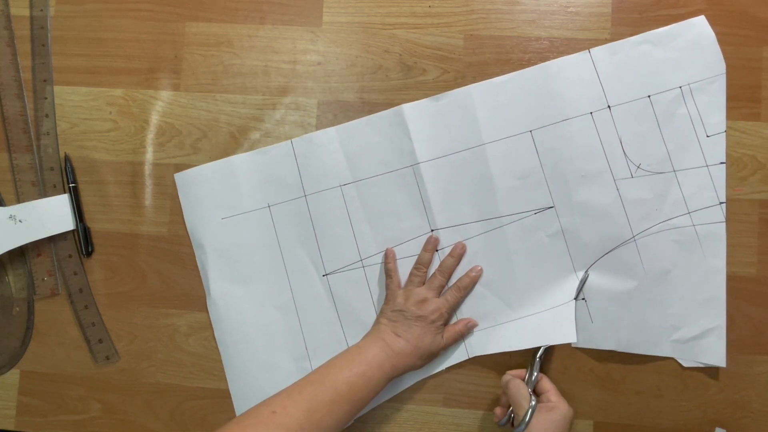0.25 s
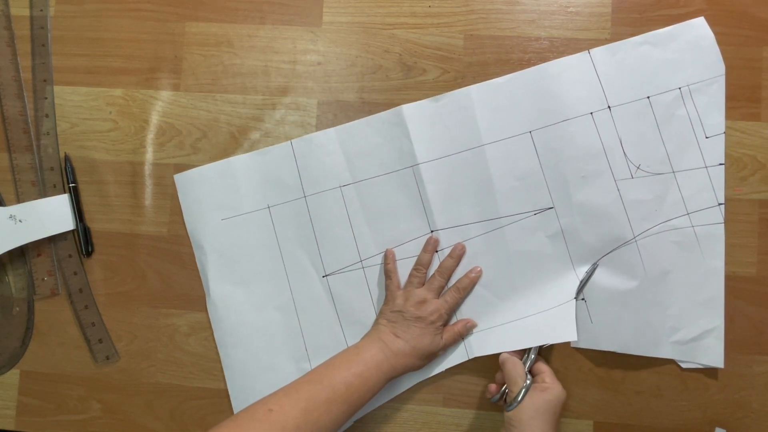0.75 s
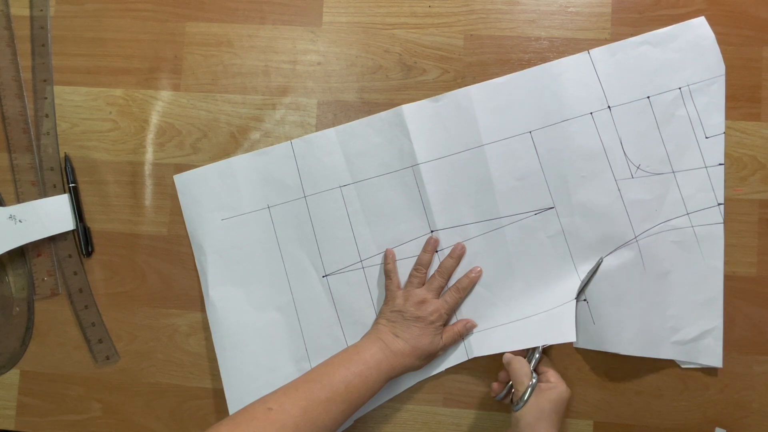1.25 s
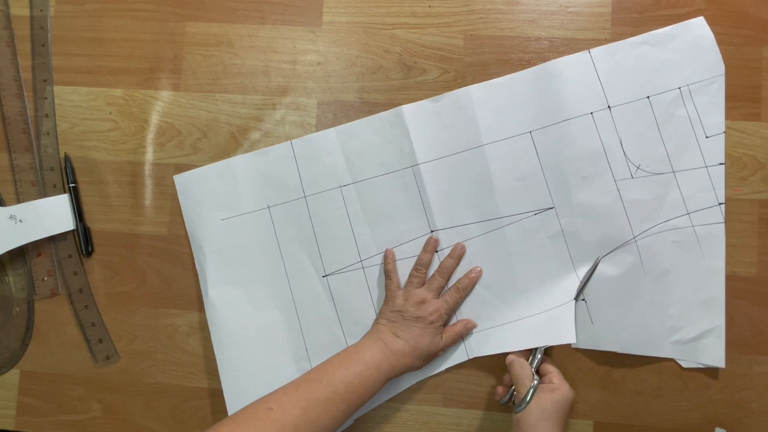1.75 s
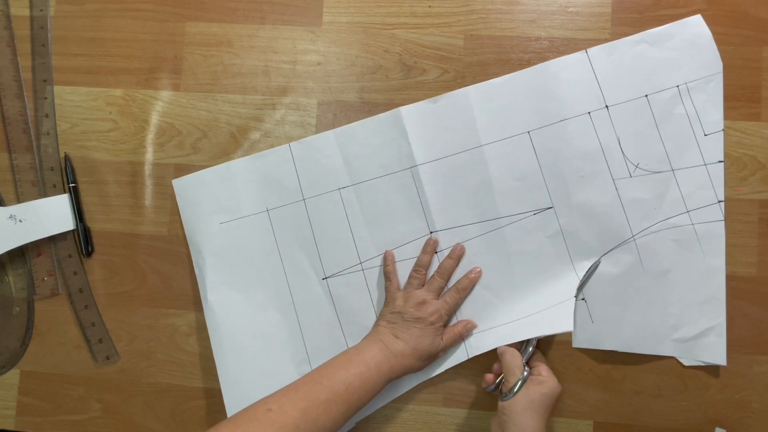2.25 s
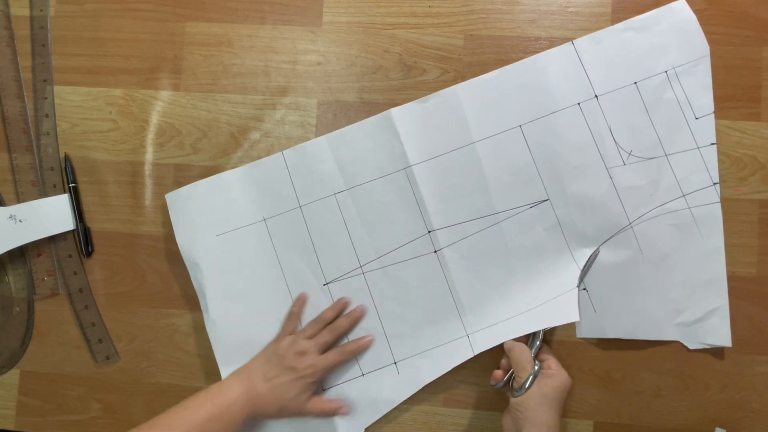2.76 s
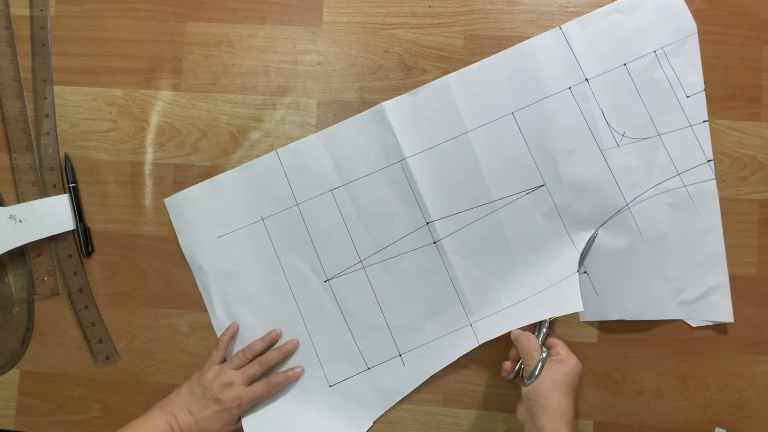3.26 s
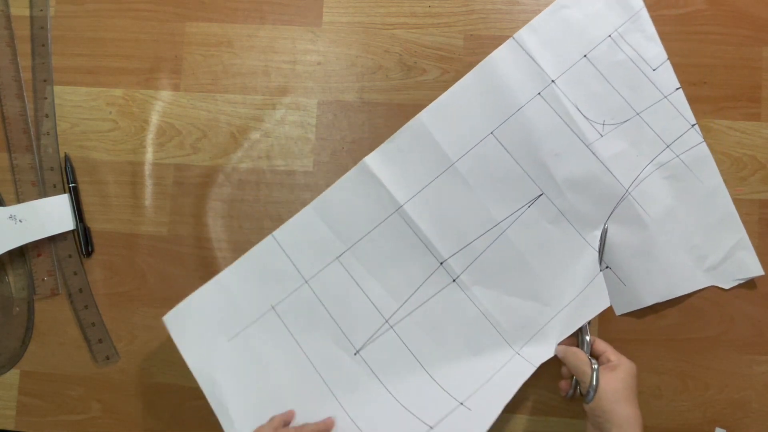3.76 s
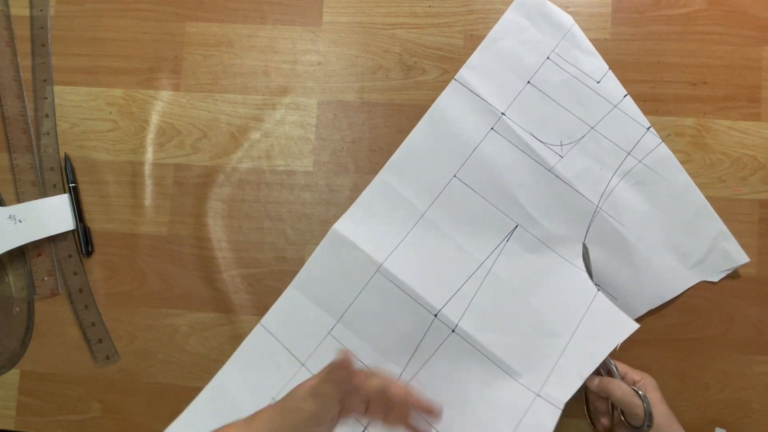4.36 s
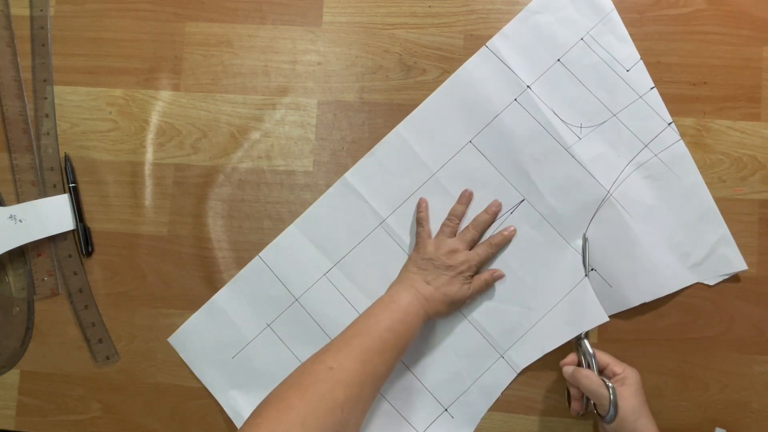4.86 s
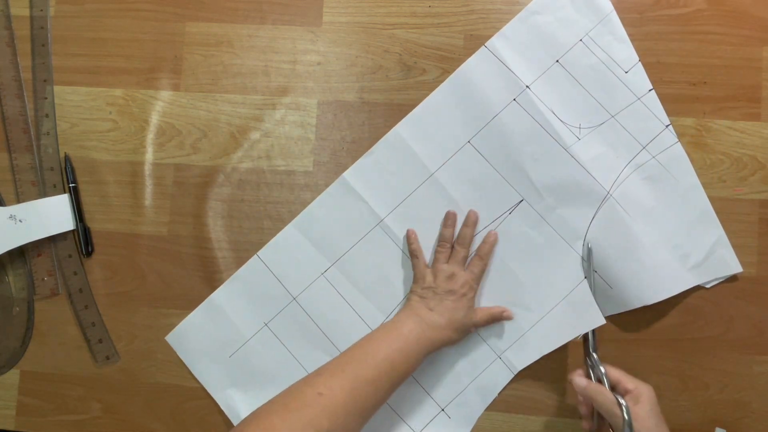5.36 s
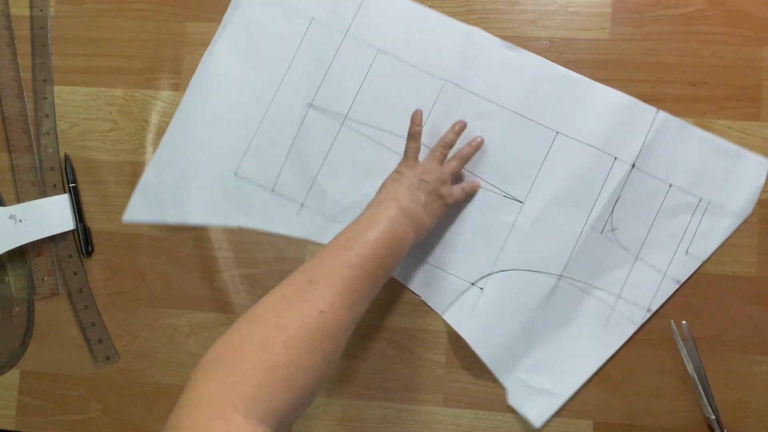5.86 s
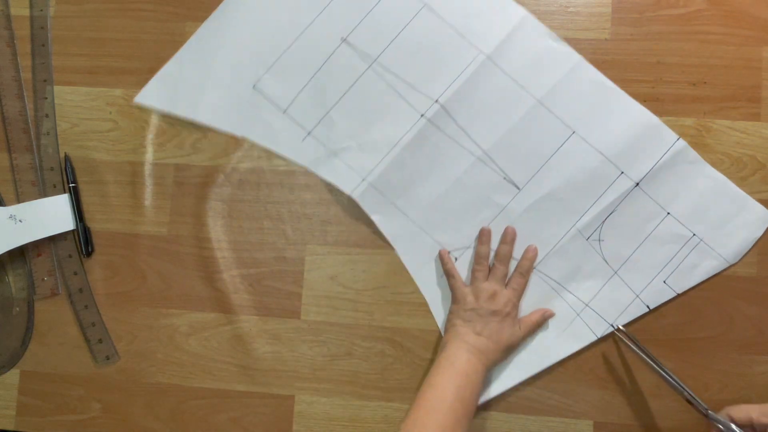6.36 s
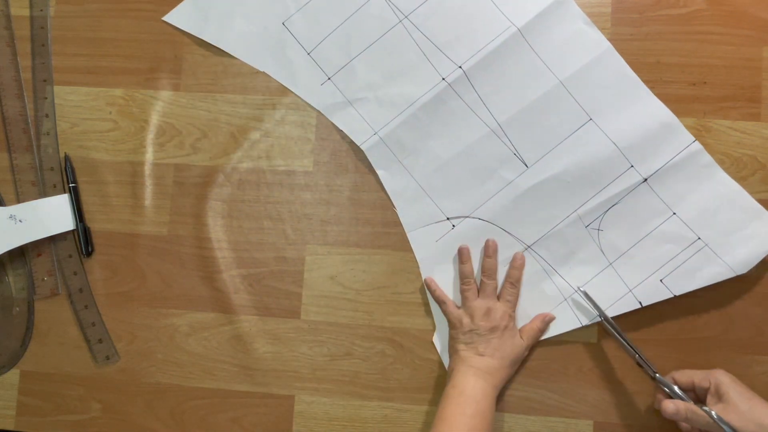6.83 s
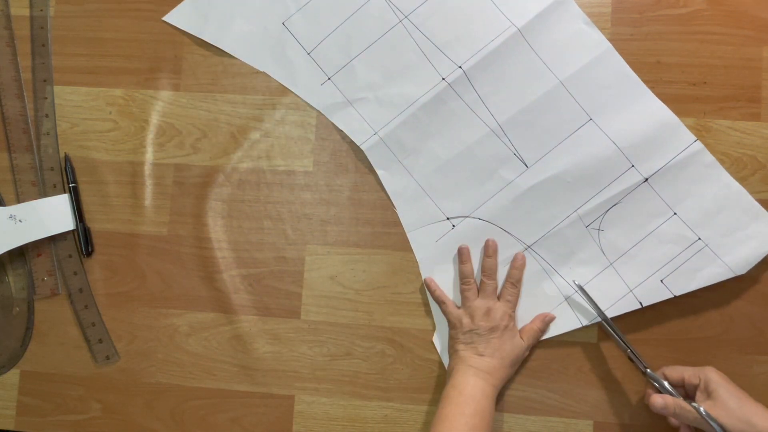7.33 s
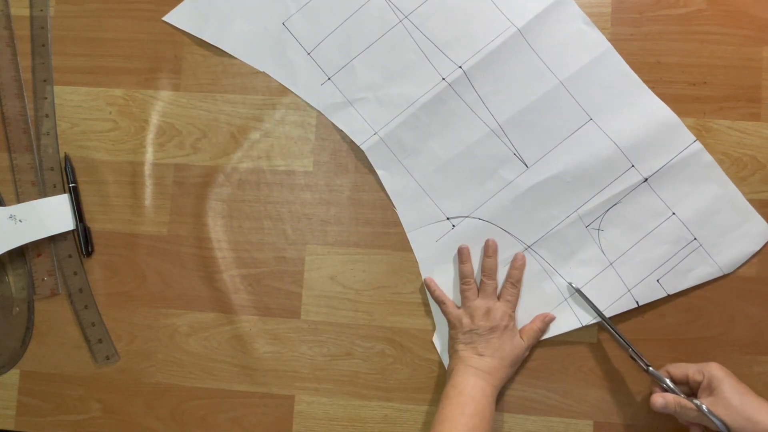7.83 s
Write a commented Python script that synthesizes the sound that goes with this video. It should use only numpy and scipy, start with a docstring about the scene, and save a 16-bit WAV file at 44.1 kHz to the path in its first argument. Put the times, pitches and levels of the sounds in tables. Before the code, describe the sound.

A few scissor cuts, then stiff paper rustling, snapping and sliding on wood before the cutting resumes, with a faint hum indoors.

```python
"""Scissors cutting paper on a wooden floor

Steel blades part the fibres of a large sheet in clicks and knock the boards into resonance.
A hand lifts, turns and slides the sheet, which snaps, crackles, hisses and rasps; fingers pat the floor.
An appliance hums over a low rumble in the small room. Two close microphone ports hear it from above."""
import sys
import numpy as np
from scipy import signal
from scipy.fft import rfft, irfft, next_fast_len
from scipy.io import wavfile
from scipy.ndimage import map_coordinates

SR = 44100
rng = np.random.default_rng(int(sys.argv[2]) if len(sys.argv) > 2 else 0)


def dump_mix(stems):
    """Bounce the given channels to the path in sys.argv[1] as a 16-bit WAV at rate SR."""
    frames = np.atleast_2d(stems).T  # one column per channel
    limited = np.clip(frames, -1, 1)  # hard clip at full scale
    pcm = np.round(limited * 32767).astype(np.int16)
    wavfile.write(sys.argv[1], SR, pcm)


N = 356769

# Resonances of paper and steel at the cut: f/Hz, bandwidth/Hz, level/dB
CUT_MODES = [(950, 260, -8.5), (1320, 420, -5), (2590, 570, -1), (5600, 1420, 3.5), (8900, 14000, -12)]
# Resonances of the floorboards: f/Hz, bandwidth/Hz, level/dB
BOARD_MODES = [(254, 60, -3), (338.3, 46.5, 2.5), (670, 40, -4.5), (910, 25, -3), (1290, 55, -7.5),
               (1455, 16, -3)]
# Blade slips: loudest t/s, build-up/s, level/dB, relative knock level/dB, tilt/(dB per octave)
BLADE_SLIPS = [(0.044, 0.0047, -41, -10, -4), (0.076, 0.0041, -43.5, -8, -2.5),
               (0.639, .003, -42, -4, -9.5), (0.673, 0.0062, -42, 6.5, -0.5),
               (0.684, 0.0073, -44.5, -13, -1), (0.711, 0.0048, -48.5, 6, 1),
               (0.7334, 0.0021, -34.5, -11, -4.5), (0.806, 0.0072, -44, -2.5, -4.5),
               (0.849, 0.0061, -39, -4, -2.5), (0.8537, 0.0047, -37, -19, -6.5),
               (1.9254, 0.00096, -27, -27, -1.5), (1.931, .004, -34.5, -2.5, -6),
               (2.039, 0.0045, -48, 6, -3), (2.186, .003, -47, -30, 0), (2.197, 0.0065, -43, -30, -5),
               (2.213, 0.0036, -34.5, -10, -3.5), (2.263, 0.0046, -43.5, -11, 0),
               (7.532, 0.013, -49.5, 8, -2), (7.606, .007, -50.5, 10, -2), (7.69, 0.006, -41, 0.5, -6.5),
               (7.726, 0.005, -46.5, 6.5, -4.5), (7.756, 0.0034, -49.5, 10, -8),
               (7.795, 0.0093, -42.5, -18, -6.5), (7.84, 0.0082, -43, 4.5, -5.5),
               (7.883, 0.011, -39.5, 2, -9), (7.941, 0.0088, -41.5, 8, -3.5),
               (8.004, 0.0028, -50.5, 8.5, -1)]
def scissors():
    """Fracture and impact: each slip parts a growing run of fibres and knocks the boards at a new spot."""
    out, t = np.zeros(N + SR), np.arange(SR // 4) / SR
    f = np.fft.rfftfreq(len(t), 1 / SR)
    blunt_push = rfft(np.hanning(28), len(t))
    for s, build, db, knock_db, tilt in BLADE_SLIPS:
        cut = [(hz, width, level + tilt * np.log2(hz / 3000)) for hz, width, level in CUT_MODES]
        spot = [(hz * (1 + 0.02 * rng.normal()), width, level + 2.5 * rng.normal())
                for hz, width, level in BOARD_MODES]
        fibres = burst(t, attack=max(build, 1 / SR), t60=0.016, spiky_db=4.0, first=0)
        click = irfft(rfft(fibres) * resonances(cut)(f), len(t))
        knock = irfft(blunt_push * resonances(spot)(f), len(t))
        add(out, s - build, amp(db) * click)
        add(out, s - build / 2, amp(db + knock_db + 17) * knock)
    return out[:N]


# Creases giving way: t/s, relative level/dB, panel f/Hz, T60/s, relative crack level/dB
CREASE_SNAPS = [(2.594, -40, 1430, 0.055, -18), (2.683, -32.5, 1730, 0.026, -20),
                (2.722, -30, 1500, 0.052, -22), (2.729, -29, 2270, 0.046, -22),
                (2.794, -31.5, 1170, 0.055, -17), (2.802, -33, 1980, 0.042, -20),
                (2.81, -25.5, 2580, 0.01, -14), (2.814, -32, 1400, .03, -25),
                (2.918, -39.5, 2460, .067, -18), (3.168, -31.5, 2240, 0.075, -26),
                (3.1859, -24, 2700, 0.012, -16.5), (3.306, -27, 2100, 0.037, -24),
                (3.334, -39, 1920, 0.045, -20), (3.444, -29.5, 2200, 0.022, -9),
                (3.462, -30.5, 2780, 0.026, -11), (3.5115, -24, 855, 0.023, -28),
                (3.542, -36, 1810, .04, -14), (3.562, -39, 1830, 0.026, -14),
                (3.582, -39, 1700, 0.037, -20), (3.609, -32, 1350, 0.073, -15),
                (3.723, -29.5, 1460, 0.031, -19), (3.842, -37, 1150, 0.16, -21),
                (3.892, -40, 1610, 0.053, -11), (3.988, -37, 1560, 0.24, -18),
                (4.024, -31.5, 1620, 0.073, -18), (4.046, -21, 1740, 0.03, -14),
                (4.22, -27.5, 2120, .035, -32), (4.241, -24.5, 1050, 0.031, -32),
                (4.309, -27, 2000, 0.023, -34), (4.389, -28, 1100, 0.034, -21),
                (4.598, -31.5, 2460, .042, -25), (4.612, -23.5, 2350, .06, -17),
                (4.6201, -14.5, 2120, .014, -19), (4.623, -26, 1050, 0.057, -7.5),
                (4.63, -23, 2400, 0.046, -23), (5.254, -34.5, 1510, 0.019, -28),
                (5.3778, -25, 1970, 0.053, -26), (5.392, -27.5, 2150, 0.065, -11),
                (6.212, -41, 3740, 0.074, -10), (6.216, -41.5, 1800, .14, -10)]
def creases():
    """Buckling: a crease gives way with a bright crack and ticks that ring two modes of the paper panel."""
    out, t = np.zeros(N + SR), np.arange(SR // 6) / SR
    f = np.fft.rfftfreq(len(t), 1 / SR)
    bright = resonances([(5000, 4000, 0)])(f) / (1 + 1j * f / 8000)
    for s, db, hz, t60, crack_db in CREASE_SNAPS:
        modes = resonances([(hz, 0.36 * hz, 0), (1.8 * hz, 0.36 * hz, -6.5)])(f)
        panel = modes / (1 + 1j * f / (1.6 * hz)) ** 2  # paper damps its treble
        ticks = burst(t, attack=0.0013, t60=t60, spiky_db=4.5, first=6.0)
        crack = amp(crack_db) * burst(t, attack=0.00025, t60=0.041, spiky_db=10.0, first=2.5)
        add(out, s, amp(db + 6.5) * irfft(rfft(ticks) * panel + rfft(crack) * bright, len(t)))
    return out[:N]


# Spectrum of sliding paper: f/Hz, density level/dB
HISS_SPECTRUM = [(500, -48), (1000, -31), (2000, -3.5), (4000, 1.5), (6000, 4.5), (8500, -2), (12000, -6.5),
                 (16000, -14)]
# Sheet or blade sliding over the floor: fastest t/s, rise/s, fall/s, level/dB
SLIDE_STROKES = [(0.03, 0.093, 0.15, -64.5), (0.34, 0.18, 0.2, -56), (0.7, 0.056, 0.08, -63),
                 (1.16, 0.13, 0.12, -60.5), (1.95, 0.057, 0.1, -60.5), (2.23, 0.092, 0.25, -60.5),
                 (2.57, 0.3, 0.31, -58), (2.72, 0.1, 0.11, -53), (2.82, 0.093, 0.16, -51),
                 (2.96, 0.16, 0.18, -55.5), (3.19, 0.079, 0.071, -52.5), (3.35, 0.22, 0.48, -53),
                 (3.88, 0.69, 0.26, -59.5), (4.05, 0.21, 0.09, -51), (4.18, 0.085, 0.13, -51),
                 (4.47, 0.18, 0.28, -56), (4.65, 0.11, 0.13, -50), (4.97, 0.19, 0.095, -60.5),
                 (5.2, 0.39, 0.25, -62.5), (5.38, 0.22, 0.074, -55.5), (5.5, 0.21, 0.57, -50.5),
                 (5.7, 0.33, 0.27, -47.5), (5.88, 0.51, 0.2, -49), (6.39, 0.19, 0.22, -48.5),
                 (6.75, 0.15, 0.11, -62), (7.87, 0.61, 0.47, -68)]
def sliding():
    """Sliding friction: paper on wood makes a broadband hiss that swells with each stroke."""
    hiss = noise(spectrum(HISS_SPECTRUM), grain_db=1.0, grain_rate=590)
    unevenness = amp(0.9 * wobble(25))
    return unevenness * swells(SLIDE_STROKES, rest_db=-77.5) * hiss


# Spectra of crackling paper, a flapping panel and the air it pushes: f/Hz, density level/dB
CRACKLE_SPECTRUM = [(300, -14), (700, -2), (1600, 2), (2500, 1.5), (4000, -6.5), (8000, -33), (16000, -40)]
FLAP_SPECTRUM = [(250, -42), (500, -0.5), (800, 4.5), (1200, -9.5), (2500, -47)]
PUFF_SPECTRUM = [(20, -20), (45, -3), (90, 1), (170, -19), (300, -15), (1000, -89)]
# Bends of the sheet: tightest t/s, rise/s, fall/s, crackle level/dB, flap level/dB
SHEET_BENDS = [(0.02, 0.12, 0.17, -64.5, -55), (0.36, 0.13, 0.2, -55.5, -64.5),
               (0.68, .04, 0.19, -58.5, -66), (0.87, 0.077, 0.074, -62, -61),
               (1.15, 0.13, 0.15, -63.5, -84), (2.02, .1, 0.22, -64.5, -65),
               (2.23, 0.087, 0.092, -54, -59.5), (2.71, 0.082, 0.12, -51.5, -61),
               (2.82, 0.06, 0.097, -53, -73), (2.96, 0.1, 0.21, -58, -72), (3.19, 0.08, 0.092, -56, -79),
               (3.35, 0.17, .15, -53.5, -72), (3.58, 0.42, 0.23, -47.5, -49.5),
               (3.87, 0.12, 0.36, -53, -58.5), (4.051, 0.045, 0.097, -43, -43.5),
               (4.23, 0.14, 0.048, -47.5, -51.5), (4.36, 0.39, 0.14, -57, -52.5),
               (4.48, 0.084, 0.25, -57.5, -74), (4.63, 0.069, 0.088, -45.5, -49.5),
               (4.97, 0.088, .08, -61.5, -79), (5.26, 0.33, 0.19, -61.5, -77), (5.4, 0.1, 0.099, -53, -59),
               (5.6, 0.29, 0.12, -60.5, -77), (5.85, 0.27, 0.28, -63.5, -69),
               (6.22, 0.027, 0.056, -77, -51.5), (6.38, 0.1, 0.17, -61, -58), (6.75, .1, 0.37, -64, -71),
               (7.87, 1, 0.5, -61.5, -62)]
def bending():
    """Flexure of a thin sheet: it crackles in clumped grains, while wide panels flap and displace air."""
    crackle = noise(spectrum(CRACKLE_SPECTRUM), grain_db=3, grain_rate=180)
    flap = noise(spectrum(FLAP_SPECTRUM), grain_db=1.5, grain_rate=60)
    puff = amp(-6.5) * noise(spectrum(PUFF_SPECTRUM), grain_db=3.0, grain_rate=35)
    crackling = swells([(s, rise, fall, db) for s, rise, fall, db, _ in SHEET_BENDS], rest_db=-79)
    flapping = swells([(s, rise, fall, db) for s, rise, fall, _, db in SHEET_BENDS], rest_db=-71)
    return crackling * crackle + flapping * (flap + puff)


# Rasps of the sheet's edge: hardest t/s, rise/s, fall/s, level/dB, f/Hz
EDGE_RASPS = [(0.359, 0.093, 0.14, -70, 2080), (1.15, 0.081, 0.089, -65, 2110),
              (2.402, 0.15, 0.13, -59, 2520), (2.54, 0.11, 0.27, -57.5, 2550),
              (2.88, 0.052, 0.054, -54, 2430), (2.96, 0.054, 0.23, -56, 2400),
              (5.5, 0.073, 0.22, -56, 2270), (5.62, 0.1, 0.1, -58, 2280), (5.675, 0.035, 0.11, -46, 5700),
              (5.81, 0.06, 0.066, -50, 4740), (7.971, 0.11, 0.21, -67, 2930)]
def paper_edge():
    """Roughness excitation: a stiff edge chatters over the wood grain, at a pitch set by how it lies."""
    out, t = np.zeros((N + SR, 2)), np.arange(-SR // 4, SR // 4) / SR
    f = np.fft.rfftfreq(len(t), 1 / SR)
    grain = amp(2.1 * wobble(200))
    for s, rise, fall, db, hz in EDGE_RASPS:
        band = resonances([(hz, 0.56 * hz, 0)])(f) ** 2
        chatter = unit(irfft(rfft(rng.standard_normal((2, len(t)))) * band))
        add(out, s + t[0], (swell(t, rise, fall, db) * chatter).T)
    return spread(out[:N].T * grain)


# Fingers landing on the floor: t/s, level/dB
FINGER_PATS = [(6.295, -33), (6.314, -43), (6.333, -43), (6.352, -43), (6.379, -37.5), (6.408, -41),
               (6.487, -38.5), (6.498, -40), (6.514, -41), (6.529, -44)]
def fingers():
    """Dispersion: the floor's bending waves arrive high first, so each finger's thud falls in pitch."""
    out, t = np.zeros(N + SR), np.arange(SR // 8) / SR
    attack_s, t60_s = 0.0022, 0.058
    hz = 200 + 620 * np.exp(-t / 0.0033)
    envelope = np.minimum(t / attack_s, 1) * amp(-60 * t / t60_s)
    thud = envelope * np.sin(2 * np.pi * np.cumsum(hz) / SR)
    for s, db in FINGER_PATS:
        add(out, s, amp(db) * thud)
    return out[:N]


# Hand or blade dragging on the boards: hardest t/s, rise/s, fall/s, level/dB
BOARD_RUBS = [(0.06, 0.089, 0.098, -51.5), (0.67, 0.036, 0.14, -54), (1.95, 0.034, 0.065, -52),
              (2.27, 0.057, 0.17, -57.5), (2.83, 0.22, 0.18, -52.5), (3.31, 0.28, 1, -61),
              (4.2, 0.23, 0.38, -55.5), (4.64, 0.075, .05, -53), (5.5, 0.61, 1, -62.5),
              (6.35, 0.13, 0.2, -53.5), (6.52, 0.12, 0.13, -52.5), (7.6, 0.16, 0.11, -55),
              (7.84, 0.34, 0.32, -49.5)]
def rubbed_boards():
    """Resonance driven by friction: a dragging hand or blade makes the floor hum in lumps."""
    soft_modes = lambda hz: resonances(BOARD_MODES)(hz) / (1 + (hz / 700) ** 2)
    return swells(BOARD_RUBS, rest_db=-73.5) * noise(soft_modes, grain_db=2.2, grain_rate=60)


# Level over time of a low rumble, louder while the sheet is handled: t/s, relative level/dB
RUMBLE_LEVELS = [(0, -51), (.2, -62), (.6, -78), (1.04, -65.5), (1.8, -61), (2.27, -59), (2.54, -52),
                 (3.15, -49.5), (3.9, -54), (4.5, -51.5), (5.25, -55), (5.7, -58), (6.5, -50), (6.9, -55.5),
                 (7.45, -50), (8.09, -50)]
def low_rumble():
    """Spectral broadening: a low wavering tone is blurred by a skirt of noise."""
    rumble = wavering(56.8, stray_hz=3.96, rate=14, swell_db=1.5) + 0.62 * skirt(60.7, 49)
    return amp(timeline(RUMBLE_LEVELS) - 3.0) * rumble


# Level over time of a background hum: t/s, relative level/dB
HUM_LEVELS = [(0, -56), (.2, -58), (.6, -49), (.78, -53.5), (1.04, -72), (1.22, -55.5), (1.87, -61),
              (2.0, -52), (2.16, -65), (2.3, -51), (2.54, -64.5), (2.84, -52), (4.0, -51.5), (4.15, -50.5),
              (4.7, -50), (5.25, -57), (5.7, -49), (6.1, -52), (6.26, -48.5), (6.94, -52.5), (7.4, -54),
              (7.64, -48), (7.86, -56), (8.09, -47)]
# Its steady partials: f/Hz, bandwidth/Hz, relative level/dB
HUM_PARTIALS = [(100.7, 6.7, -3.5), (199.4, 6.2, -5.5), (249.2, 3.95, -3.5), (342, 26, -19),
                (398.5, 10.2, -11)]
def appliance_hum():
    """Tonal noise: an appliance drones in one wavering tone among steady narrowband partials."""
    hum = wavering(149, stray_hz=3.92, rate=20, swell_db=2.0) + 0.78 * skirt(146.0, 44.0)
    partials = amp(-59.0) * noise(resonances(HUM_PARTIALS), grain_db=0.5, grain_rate=4.15)
    return amp(timeline(HUM_LEVELS) - 2.5) * hum + partials


# Spectrum of the room's air: f/Hz, density level/dB
AIR_SPECTRUM = [(15, -45), (24, 1), (40, -2.5), (80, 0.5), (170, -8.5), (300, -17.5), (600, -12.5),
                (1200, -19.5), (2600, -22), (4000, -28.5), (6500, -28), (10000, -107), (16000, -81)]
def room_air():
    """Ambient noise: a faint continuous spectrum, strongest in the bass."""
    return amp(-56.5) * noise(spectrum(AIR_SPECTRUM), grain_db=1.37, grain_rate=17)


# Reverberation time of the room: f/Hz, T60/s
ROOM_DECAY = [(200, 0.46), (1500, 0.14), (5000, 0.17), (12000, 0.011)]
def reverberation(x):
    """Absorption: the short echo dies fastest in the treble, with a fresh random tail every half second."""
    step = SR // 2
    delayed = np.pad(x, (120, 0))
    blocks = np.pad(delayed, (0, -len(delayed) % step)).reshape(-1, 1, step)
    hz, t, diffuse = signal.stft(rng.standard_normal((len(blocks), 2, step // 2)), SR, nperseg=256)
    tails = signal.istft(diffuse * amp(-60 * t / along(ROOM_DECAY, hz)[:, None]), SR, nperseg=256)[1]
    tails /= np.linalg.norm(tails, axis=2, keepdims=True)
    out = np.zeros((N + SR * 2, 2))
    for k, echo in enumerate(signal.fftconvolve(blocks, tails, axes=2)):
        add(out, k * step / SR, echo.T)
    return spread(out[:N].T)


# Likeness of the sound at the two ports: f/Hz, coherence/1
COHERENCE = [(60, .995), (250, .92), (600, .55), (1200, .68), (3000, .62), (6000, .65), (9000, .8),
             (15000, .8)]
def spread(pair, response=np.ones_like):
    """Partial coherence: two independent signals are coloured and mixed as mid and side."""
    def weights(hz):
        angle = np.arccos(np.clip(along(COHERENCE, hz), 0, 1)) / 2
        return response(hz) * np.array([np.cos(angle), np.sin(angle)])
    mid, side = filtered(pair, weights)
    return np.array([mid + side, mid - side])


def noise(response, grain_db, grain_rate):
    """Random amplitude modulation: coloured stereo noise of rms 1 whose level moves in grains."""
    grainy = rng.standard_normal((2, N)) * amp(grain_db * wobble(grain_rate))
    return unit(spread(grainy, response))


def skirt(hz, width):
    """Narrowband noise around a tone."""
    return noise(lambda f: resonances([(hz, width, 0)])(f) ** 2, grain_db=-1.0, grain_rate=4.39)


def burst(t, attack, t60, spiky_db, first):
    """A transient: uneven ticks build up and decay exponentially, after an impulse of height first."""
    ticks = rng.standard_normal(len(t)) * amp(spiky_db * rng.standard_normal(len(t)))
    envelope = np.minimum(t / attack, 1) ** 0.52 * amp(-60 * np.maximum(t - attack, 0) / max(t60, .004))
    return unit(ticks * envelope) * np.sqrt(np.mean(envelope ** 2)) + first * (t == 0)


def wavering(hz, stray_hz, rate, swell_db):
    """Random amplitude and frequency modulation of a tone of rms 1."""
    gain = amp(swell_db * wobble(rate))
    pitch = hz + stray_hz * wobble(rate)
    return unit(gain * np.sin(2 * np.pi * np.cumsum(pitch) / SR))


def swell(t, rise, fall, db):
    """A rounded envelope that peaks at t = 0 and is 24 dB down one rise before or one fall after."""
    away = np.where(t < 0, -t / rise, t / fall)
    return amp(db - 24 * away ** 1.64)


def swells(moves, rest_db):
    """Incoherent addition: the gain of swells whose powers sum over a resting level."""
    t = np.arange(0, N, 32) / SR
    power = amp(2 * rest_db) + sum(swell(t - s, rise, fall, db) ** 2 for s, rise, fall, db in moves)
    return np.interp(np.arange(N) / SR, t, np.sqrt(power))


def resonances(peaks):
    """Modal superposition: the response of (f/Hz, bandwidth/Hz, level/dB) modes of alternating sign."""
    return lambda f: sum((-1) ** k * amp(db) * 1j * f * width / (hz * hz - f * f + 1j * f * width)
                         for k, (hz, width, db) in enumerate(peaks))


def spectrum(points):
    """Magnitude response through (f/Hz, level/dB) points."""
    return lambda hz: amp(along(points, hz))


def filtered(x, response):
    """Linear filtering: the spectrum of x times a complex response."""
    size = next_fast_len(N + SR // 2)
    return irfft(rfft(x, size) * response(np.fft.rfftfreq(size, 1 / SR)), size)[..., :N]


def along(points, hz):
    """Interpolation of (f/Hz, value) points on a log frequency axis."""
    f, values = np.transpose(points)
    return np.interp(np.log(hz + 1), np.log(f + 1), values)


def timeline(points):
    """Interpolation of (t/s, value) points at every sample."""
    return np.interp(np.arange(N) / SR, *np.transpose(points))


def wobble(rate):
    """A smooth random curve, rate knots a second."""
    return map_coordinates(rng.standard_normal(int(N * rate / SR) + 4), [np.arange(N) * rate / SR])


def amp(db):
    """Level to amplitude ratio."""
    return 10 ** (np.asarray(db) / 20)


def unit(x):
    """Normalisation to rms 1."""
    return x / np.sqrt(np.mean(x ** 2) + 1e-20)


def add(track, s, sound):
    """Superposes a short sound on a track at time s."""
    track[round(s * SR):][:len(sound)] += sound


def scene():
    """Superposition: the transients and their reverberation over friction noise and the background."""
    snaps, snips, pats = creases(), scissors(), fingers()
    direct = snaps * amp([[.8], [-.8]]) + snips + pats  # the snaps lie slightly left
    reflected = reverberation(amp(-9) * snaps + amp(-11) * snips + amp(-12) * pats)
    handling = sliding() + bending() + paper_edge() + rubbed_boards()
    return direct + reflected + handling + low_rumble() + appliance_hum() + room_air()


# Level difference between the ports: f/Hz, left minus right/dB
PORT_LEVEL = [(60, 0.5), (150, -2.5), (380, -5.5), (950, 0), (2380, 1.5), (5980, -1), (15000, 0)]
# Phase difference between the ports: f/Hz, lead of the left/rad
PORT_PHASE = [(0, 0), (340, 0.1), (690, 1.8), (1810, 0.2), (2580, 1.1), (5510, 0.7), (6980, 2.9),
              (8180, 3.4), (8700, 6.0), (9390, 6.1), (12700, 6.4), (13100, 9.4), (15100, 9.5),
              (16600, 11.6)]
def record(dry):
    """Spaced receivers: the two ports differ in level and phase by frequency, up to a band limit."""
    limit_hz = 15900
    left = lambda hz: amp(along(PORT_LEVEL, hz) / 2) * np.exp(.5j * along(PORT_PHASE, hz))
    return filtered(dry, lambda hz: np.array([left(hz), 1 / left(hz)]) * (hz < limit_hz))


dry = scene()
out = record(dry)
dump_mix(out)
```